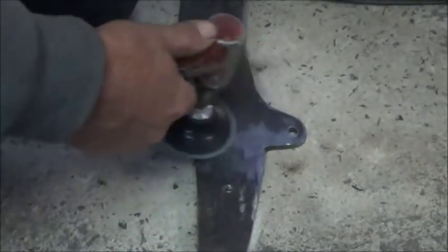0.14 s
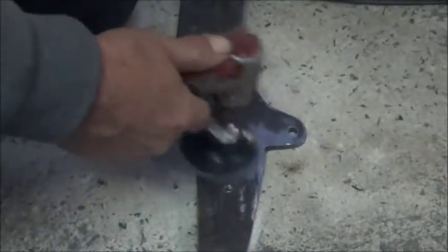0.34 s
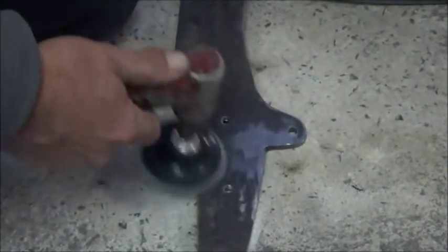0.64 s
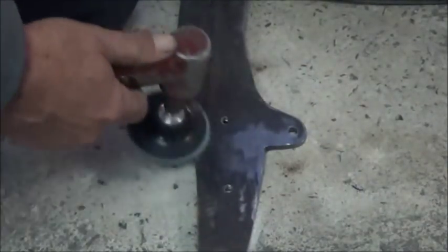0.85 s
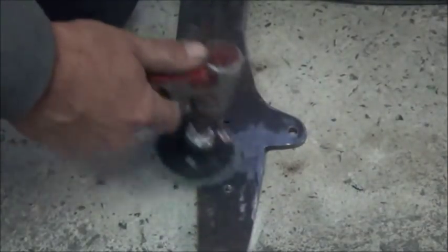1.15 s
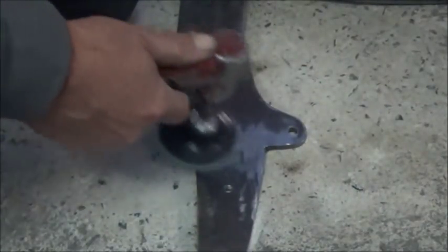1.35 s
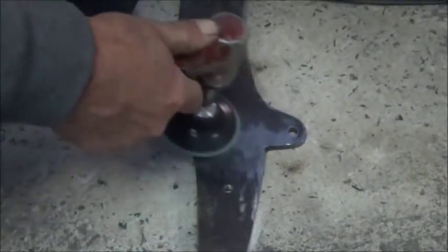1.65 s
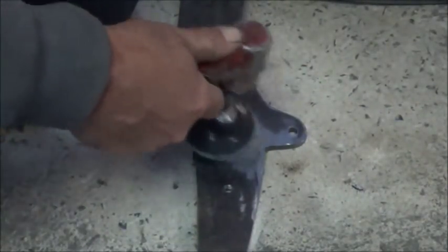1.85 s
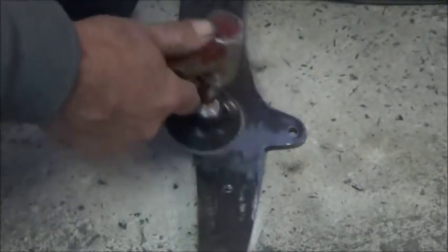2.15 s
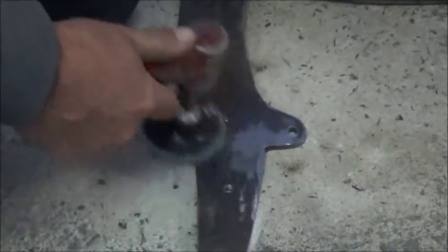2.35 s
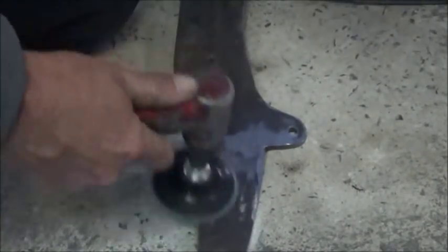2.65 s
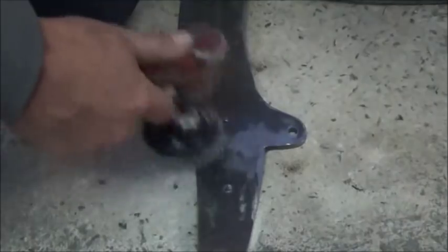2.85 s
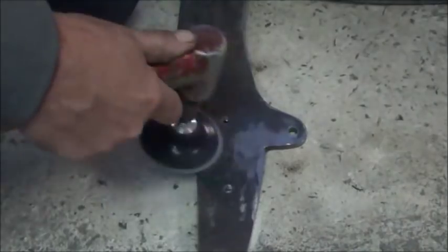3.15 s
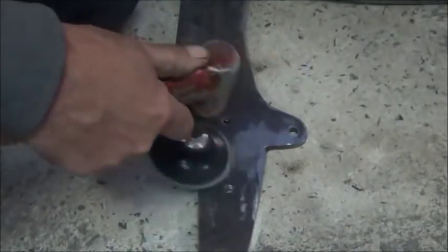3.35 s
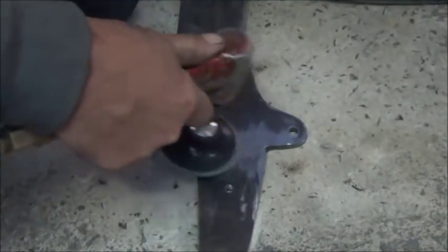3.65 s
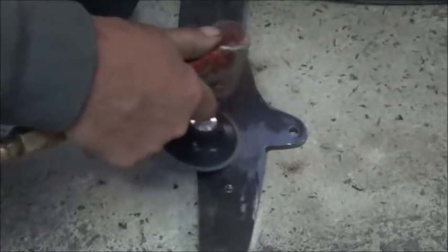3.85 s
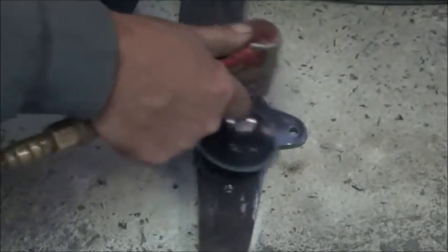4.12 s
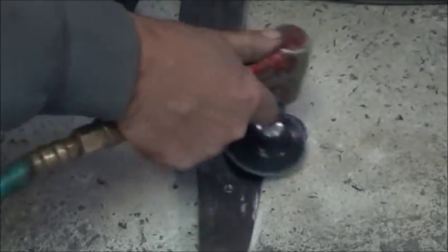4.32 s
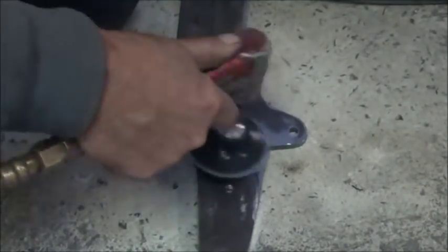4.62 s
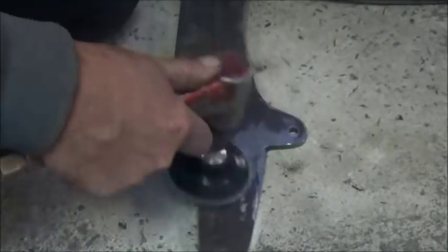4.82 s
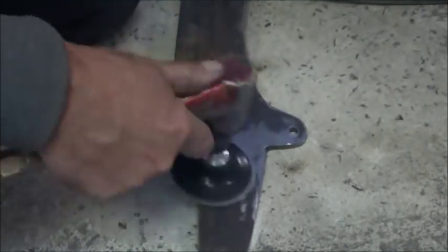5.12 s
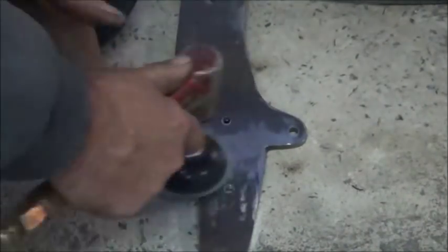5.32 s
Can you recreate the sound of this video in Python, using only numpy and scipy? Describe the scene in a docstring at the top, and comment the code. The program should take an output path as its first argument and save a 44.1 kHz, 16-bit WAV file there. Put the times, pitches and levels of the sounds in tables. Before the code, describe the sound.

An air grinder whines and hisses against steel, its high pitch wavering as the disc bounces and scrapes.

```python
"""Pneumatic die grinder on steel

An abrasive disc works a steel part lying on a concrete workshop floor. The four-vane air motor
whines and hisses through the exhaust. The hand-held disc keeps bouncing into the steel: each bite
drags the speed down and scrapes louder. Near the end the disc lifts and the motor races."""
import sys
import numpy as np
from scipy import signal
from scipy.fft import rfft, irfft, next_fast_len
from scipy.io import wavfile

SR = 44100
rng = np.random.default_rng(int(sys.argv[2]) if len(sys.argv) > 2 else 0)


def to_wav(sig):
    """Store sig (one row per channel, or 1-D mono) as 16-bit WAV at the path in sys.argv[1].

    Samples outside -1..1 are clipped; the rate is SR.
    """
    pcm = np.clip(np.atleast_2d(sig), -1, 1) * 32767
    pcm = np.round(pcm).astype(np.int16)
    wavfile.write(sys.argv[1], SR, pcm.T)  # frames by channels


N = 241447
TIME_S = np.arange(N) / SR
VANES = 4

# Resonances of the steel part and disc rim. Each row: centre in Hz, width in Hz, gain in dB.
STEEL_MODES = [(6860, 200, 5.5), (7700, 65, 3), (8440, 130, 6.5), (10100, 84, 6.5), (10880, 160, 3.5),
               (11760, 230, 3.5), (12540, 100, 4.5), (13200, 130, 2.5), (15270, 160, 2)]


def from_db(db):
    """Decibels to gain."""
    return 10 ** (np.asarray(db) / 20)


def unit_rms(x):
    """Scale to rms 1."""
    return x / np.sqrt(np.mean(x ** 2) + 1e-20)


def curves(rows):
    """Interpolate rows of (seconds, values..) to every sample, one curve per value column."""
    times_s, *columns = np.transpose(rows)
    return [np.interp(TIME_S, times_s, column) for column in columns]


def coloured(x, points):
    """Filter by a spectrum of (Hz, dB) points."""
    hz, db = np.transpose(points)
    size = next_fast_len(N)
    bins_hz = np.fft.rfftfreq(size, 1 / SR)
    gain = from_db(np.interp(np.log(bins_hz + 1), np.log(hz), db))
    return irfft(rfft(x, size) * gain, size)[..., :N]


def drift(corner_hz):
    """Smooth random wander, rms about 1."""
    step, settle = 20, 2000
    pole = np.exp(-2 * np.pi * corner_hz * step / SR)
    noise = rng.standard_normal(N // step + settle + 2)
    slow = signal.lfilter([1], [1, -2 * pole, pole * pole], noise)[settle:]
    return np.interp(np.arange(N) / step, np.arange(len(slow)), unit_rms(slow))


def resonance_db(modes, hz):
    """Gain of a body's bell-shaped peaks and dips at hz."""
    grid_hz = np.linspace(0, SR / 2, 2048)
    response_db = sum(db * np.exp(-.5 * ((grid_hz - centre) / width) ** 2) for centre, width, db in modes)
    return np.interp(hz, grid_hz, response_db)


def whine(vane_hz, phase, flutter=0.23, wander_rad=0.052, roughness=0.097, steel_share=0.45):
    """Exhaust puffs: harmonics swell and fade as they glide through resonances of tool and steel."""
    # Puff spectrum. Each row: multiple of the vane rate, base level in dB.
    harmonics = [(1, -30.5), (2, -34.5), (3, -26.5), (4, -35.5), (5, -32), (6, -30.5), (7, -30), (8, -37)]
    # Peaks and dips of exhaust port and housing. Each row: centre in Hz, width in Hz, gain in dB.
    housing_modes = [(1764, 8.7, -4.5), (1866, 51, 4.5), (2203, 12, -8.5), (2383, 46.6, -13),
                     (2722, 19, -6.5), (2905, 168, 5), (3090, 105, -12), (3550, 65, 2.5), (4110, 155, -2.5),
                     (5965, 274, -4), (7810, 574, -12), (9295, 273, -28), (11260, 1170, 3), (12040, 890, 3),
                     (13720, 160, -6)]
    # Each row: time in seconds, overall gain in dB, octave boost in dB, upper-harmonic boost in dB.
    whine_levels = [(0, -0.1, 3, 3.5), (0.95, -0.9, 0, 3), (1.4, 0.44, .5, 2), (1.9, -0.5, 1.5, 3),
                    (2.45, 0.5, 0, 1.5), (2.8, -2.5, -2, 8), (3.25, 0.1, 2, 0.5), (3.65, -0.5, 0.2, -1.5),
                    (4.2, 2, -2.5, -4), (5.1, 0.6, -3.2, -4.5), (5.35, .5, 2, 1)]
    overall_db, octave_db, upper_db = curves(whine_levels)
    puff_phase = phase + wander_rad * drift(400)  # turbulence shifts each puff
    blur_db = np.interp(vane_hz, (2550, 3300), [0, 9])  # puffs run together at high speed
    tone = np.zeros(N)
    for k, base_db in harmonics:
        hz = k * vane_hz
        upper_share = np.clip(k / 3 - 1, 0, 1)
        body_db = resonance_db(housing_modes, hz) + steel_share * resonance_db(STEEL_MODES, hz)
        timbre_db = (k == 2) * octave_db + upper_share * upper_db - (k > 3) * blur_db
        gain = from_db(base_db + body_db + timbre_db) * (1 + flutter * drift(56)) * (hz < SR / 2)
        tone += gain * np.sqrt(2) * np.sin(k * puff_phase + rng.uniform(0, 2 * np.pi))
    return from_db(overall_db) * tone * (1 + roughness * drift(380))


def shaft_tones(vane_hz, phase, flutter_db=3.0):
    """Weak lines from unequal vanes and disc wobble; the racing disc adds shake, most at once a turn."""
    # Each row: multiple of the shaft rate, base level in dB.
    orders = [(1, -63.5), (2, -63.5), (3, -61), (6, -61), (7, -56), (11, -48), (13, -53), (15, -60),
              (17, -53), (19, -46), (21, -63), (25, -49)]
    # Resonances of disc and holder. Each row: centre in Hz, width in Hz, gain in dB.
    disc_modes = [(559, 57, 6), (827, 54, 6.5), (1076, 54, 11.5), (1950, 65, 7)]
    unbalance_db = np.interp(vane_hz, (2900, 3400), [0, 7])
    tones = np.zeros(N)
    for order, base_db in orders:
        hz = order / VANES * vane_hz
        line = np.sqrt(2) * np.sin(order / VANES * phase + rng.uniform(0, 2 * np.pi))
        db = base_db + resonance_db(disc_modes, hz) + unbalance_db / order + flutter_db * drift(60)
        tones += from_db(db) * (hz < SR / 2) * line
    return tones


def rubbed(excitation):
    """Colour broadband excitation as exhaust air and disc on steel; rms 1."""
    # Air and abrasive noise. Each row: frequency in Hz, relative density in dB.
    spectrum = [(300, -35), (1100, -23), (1500, -23), (2100, -24.5), (2900, -25.5), (3700, -17.5),
                (4500, -12.5), (5700, -12.5), (6600, -12.5), (7900, -13), (9300, -9), (10100, -3.5),
                (12500, -3), (13800, -11), (15600, -5)]
    hz = np.geomspace(20, SR / 2, 1500)
    steel_response = np.c_[hz, resonance_db(STEEL_MODES, hz)]
    return unit_rms(coloured(coloured(excitation, spectrum), steel_response))


def hiss(phase, swell_db, base_db=-26, puff_depth=0.25, rub_depth=0.22, flutter_db=2.3, split_hz=9600):
    """Air leaves in puffs and the disc rubs once a turn; pressure raises the top band most."""
    pulsing = 1 + puff_depth * np.cos(phase) + rub_depth * np.cos(phase / VANES)
    noise = rubbed(rng.standard_normal(N) * pulsing)
    low = signal.sosfiltfilt(signal.butter(6, split_hz, fs=SR, output="sos"), noise)
    top_gain = from_db(swell_db + flutter_db * drift(54))
    low_gain = from_db(0.25 * swell_db + flutter_db * drift(34))
    return from_db(base_db) * ((noise - low) * top_gain + low * low_gain)


def grit(swell_db, base_db=-34, grains_per_s=6000, spread_db=2.5):
    """Abrasive grains tear at the steel: dense clicks of uneven size."""
    sizes = from_db(spread_db * np.minimum(rng.exponential(1, N), 4))
    signs = rng.choice([-1, 1], N)
    clicks = sizes * signs * (rng.random(N) < grains_per_s / SR)
    return from_db(base_db + swell_db) * rubbed(clicks)


def shop_background(rumble_db=-66):
    """Faint hum and rumble of the workshop."""
    # Each row: frequency in Hz, rms level in dB.
    hum_lines = [(107.7, -77.5), (479.1, -69.5)]
    # Each row: frequency in Hz, relative density in dB.
    rumble_spectrum = [(20, 3), (60, 1), (110, 1), (170, 1.5), (330, 8), (550, -1), (800, -24),
                       (1500, -14.5)]
    hum = sum(from_db(db) * np.sqrt(2) * np.sin(2 * np.pi * hz * TIME_S + .5 * drift(1.2))
              for hz, db in hum_lines)
    rumble = unit_rms(coloured(rng.standard_normal(N), rumble_spectrum))
    return hum + from_db(rumble_db) * rumble


def bite(peak_s, width_s=.025, skew=1.27):
    """Friction of one contact, peak 1: a quick grab and a slower release."""
    friction = np.zeros(N)
    near = slice(*np.searchsorted(TIME_S, [peak_s - .25, peak_s + .25]))
    age = (TIME_S[near] - peak_s) / width_s
    skewed_age = age * np.where(age < 0, skew, 1 / skew)
    friction[near] = (1 + skewed_age ** 2) ** -1.5
    return friction


def disc_drag_hz():
    """Vane rate lost to friction: single jolts plus spells of even bouncing."""
    # Snags (drop > 0) and skips (drop < 0). Each row: time in seconds, drop in Hz, width in seconds.
    jolts = [(0.027, -200, 0.017), (0.081, -330, 0.027), (0.14, -160, 0.022), (0.668, 160, 0.016),
             (1.047, 100, 0.018), (1.381, 290, 0.061), (1.454, 200, 0.03), (1.757, -140, 0.042),
             (2.231, -170, 0.027), (2.518, 300, 0.034), (2.77, -180, 0.016), (2.922, -220, 0.052),
             (3.39, 140, 0.022), (3.454, -100, 0.04), (3.541, 130, 0.016), (3.97, 130, 0.014),
             (4.25, 150, 0.024), (4.312, 270, 0.02), (4.732, -200, 0.041), (4.963, -210, 0.028),
             (5.259, -100, 0.021), (5.426, 230, 0.025)]
    # Each row: first and last bite in seconds, bite count, first and last drop in Hz.
    bounce_spells = [(0.05, 0.253, 4, 260, 570), (0.342, 0.411, 2, 580, 730), (0.475, 0.816, 6, 330, 190),
                     (0.894, 1.184, 5, 130, 350), (1.252, 1.571, 6, 450, 260), (1.634, 1.944, 6, 620, 60),
                     (2.011, 2.365, 6, 360, 120), (2.448, 2.595, 3, 250, 120), (2.694, 3.023, 5, 320, 310),
                     (3.088, 3.3, 4, 150, 370), (3.362, 3.68, 6, 750, 640), (3.74, 4.119, 7, 590, 390),
                     (4.177, 4.371, 4, 460, 350), (4.447, 4.797, 6, 670, 210), (4.87, 5.16, 5, 380, 440)]
    drag_hz = sum(drop_hz * bite(peak_s, width_s) for peak_s, drop_hz, width_s in jolts)
    for first_s, last_s, count, first_hz, last_hz in bounce_spells:
        for peak_s, drop_hz in np.linspace((first_s, first_hz), (last_s, last_hz), count):
            drag_hz += drop_hz * bite(peak_s)
    return drag_hz


def reflections(x, t60_s, build_s):
    """Dense echoes that build up and die away; unit-energy response."""
    age_s = TIME_S[:SR // 2]
    envelope = from_db(-60 * age_s / t60_s) * (1 - np.exp(-age_s / build_s))
    tail = rng.standard_normal(len(age_s)) * envelope
    return signal.fftconvolve(x, tail / np.sqrt(np.sum(tail ** 2)))[:N]


def microphone_ports(mid):
    """Two close ports: alike in the bass, they catch nearby reflections differently in the treble."""
    # Reflections in the side signal. Each row: frequency in Hz, side minus mid in dB.
    width = [(100, -47), (700, -88), (1300, -31), (2400, -11.5), (4400, -12), (8000, -12.5), (15000, -14)]
    # Slightly louder treble on the left. Each row: frequency in Hz, side minus mid in dB.
    left_bias = [(700, -50), (1300, -25), (15000, -25.5)]
    nearby = reflections(mid, t60_s=.06, build_s=.0005)
    side = coloured(nearby, width) + coloured(mid, left_bias)
    return np.array([mid + side, mid - side])


def scene(speed_jitter=0.0055, working_hz=2290, scrape_db_per_hz=0.006, speed_db_per_hz=0.002):
    """Motor speed and disc bites drive the tool's sounds; hiss and grit rise with drag and free speed."""
    # Speed between bites, set by hand pressure. Each row: time in seconds, vane rate in Hz.
    free_speed = [(0.0, 2030), (0.42, 2420), (0.62, 1940), (1.17, 2070), (1.26, 2760), (1.53, 2720),
                  (1.6, 2390), (1.95, 2290), (2.06, 2890), (2.29, 2430), (2.55, 2640), (2.8, 3090),
                  (3.24, 2470), (3.67, 2850), (3.89, 2350), (4.01, 2540), (4.54, 2610), (4.94, 2530),
                  (5.19, 2730), (5.37, 3840), (5.47, 3550)]
    # Slow swell of hiss and grit. Each row: time in seconds, gain in dB.
    noise_levels = [(0, 0), (0.5, 0.5), (0.72, -5), (0.95, 2), (1.15, -3), (1.9, 1.5), (2.55, -2.7),
                    (3.1, 0.2), (3.8, 0.5), (4.25, -0.5), (4.9, 1.5), (5.15, 0.8), (5.35, -4.5)]
    free_hz, = curves(free_speed)
    noise_db, = curves(noise_levels)
    drag_hz = disc_drag_hz()
    vane_hz = (free_hz - drag_hz) * (1 + speed_jitter * drift(50.2))
    phase = 2 * np.pi * np.cumsum(vane_hz) / SR
    swell_db = noise_db + scrape_db_per_hz * drag_hz + speed_db_per_hz * (free_hz - working_hz)
    tool = whine(vane_hz, phase) + shaft_tones(vane_hz, phase) + hiss(phase, swell_db) + grit(swell_db)
    room = from_db(-14) * reflections(tool, t60_s=0.15, build_s=0.0031)
    return microphone_ports(tool + room + shop_background())


def record(dry, cutoff_hz=15700):
    """Steep low-pass."""
    return signal.sosfilt(signal.ellip(12, .2, 90, cutoff_hz, fs=SR, output="sos"), dry)


dry = scene()
out = record(dry)
to_wav(out)
```